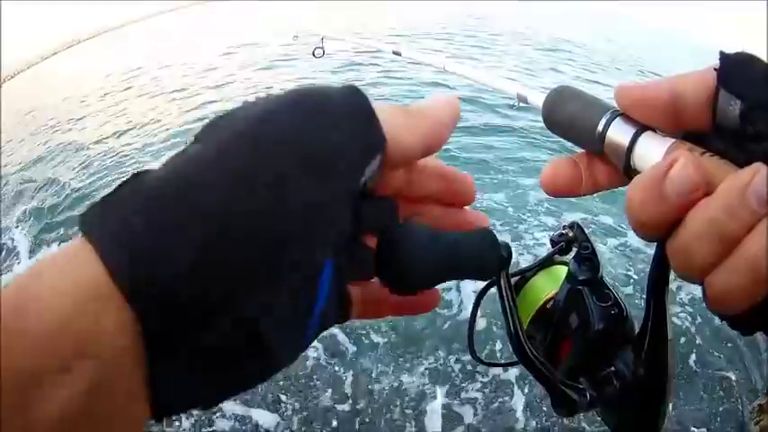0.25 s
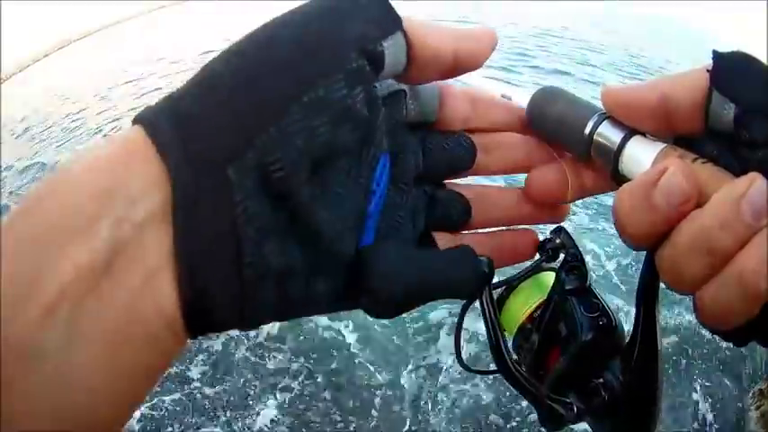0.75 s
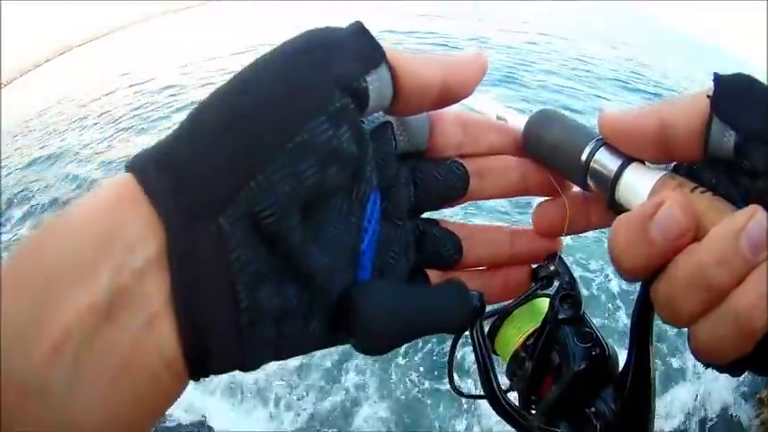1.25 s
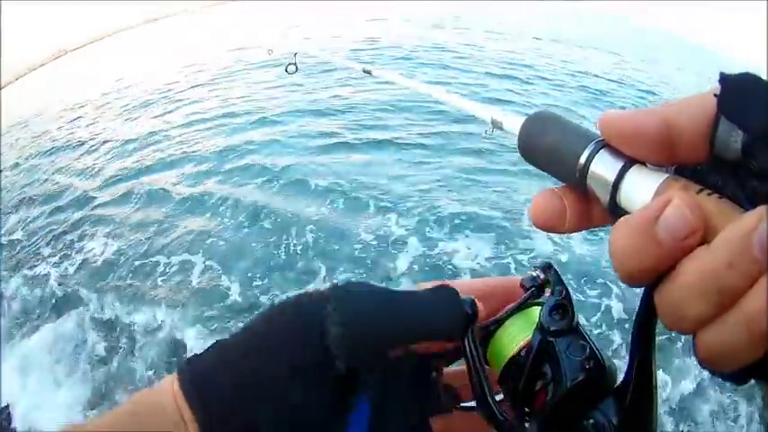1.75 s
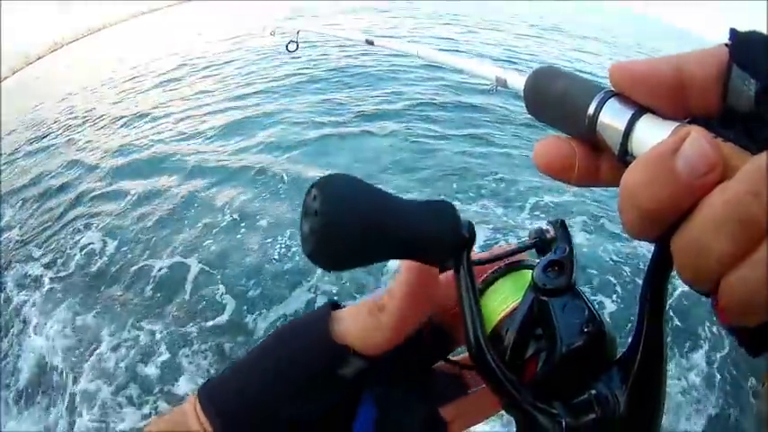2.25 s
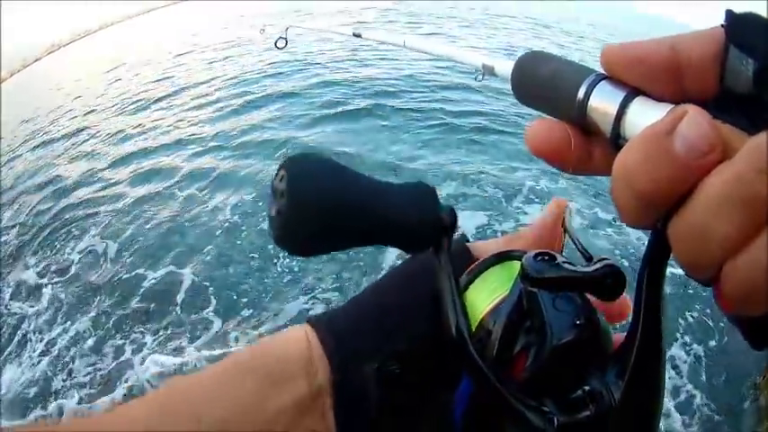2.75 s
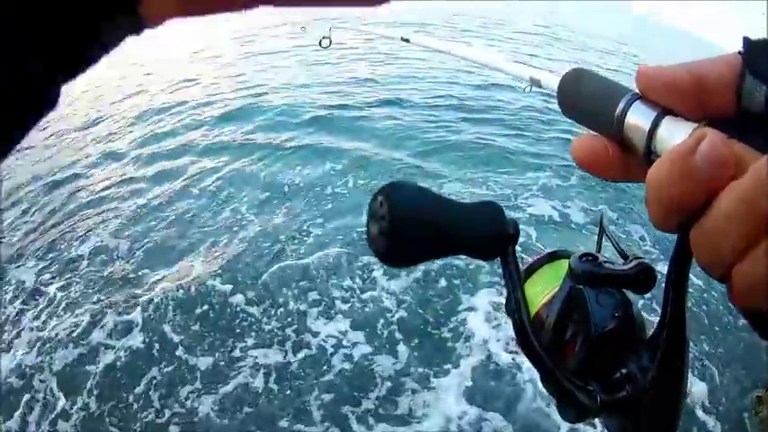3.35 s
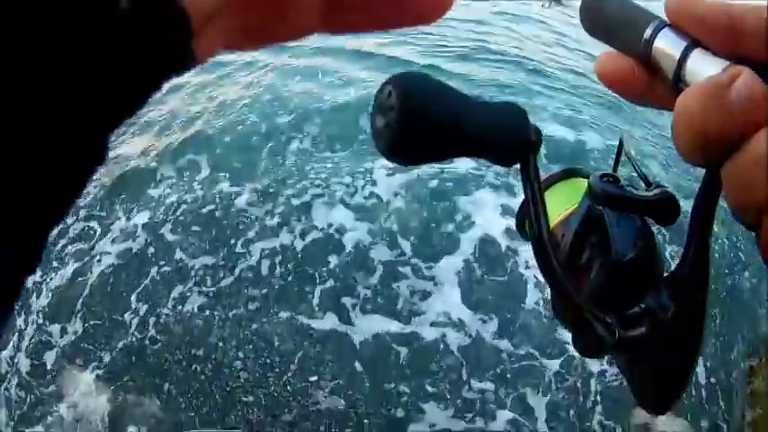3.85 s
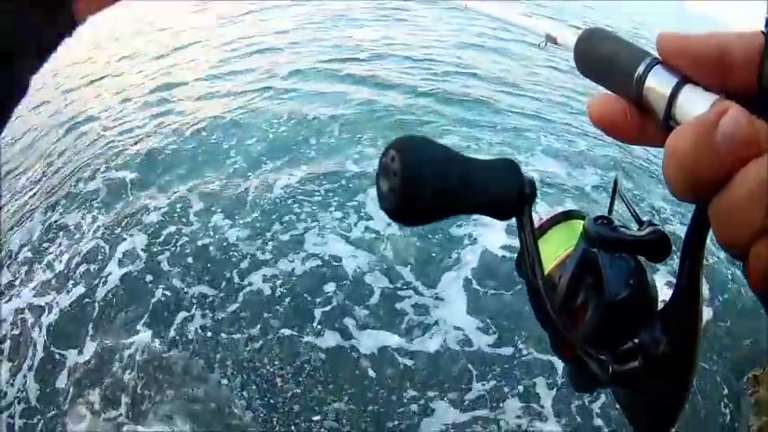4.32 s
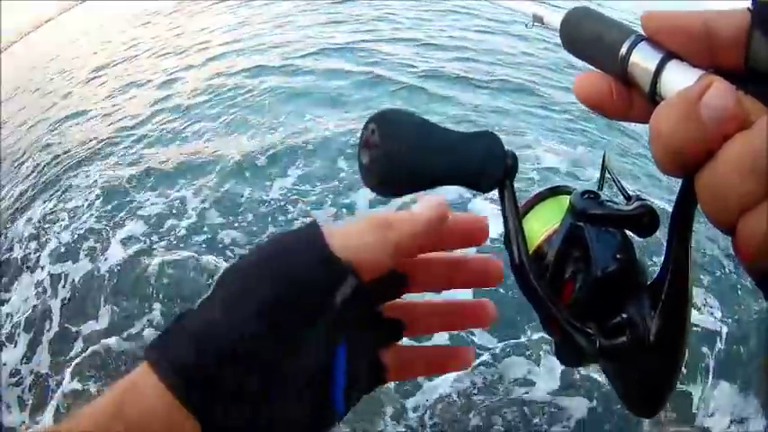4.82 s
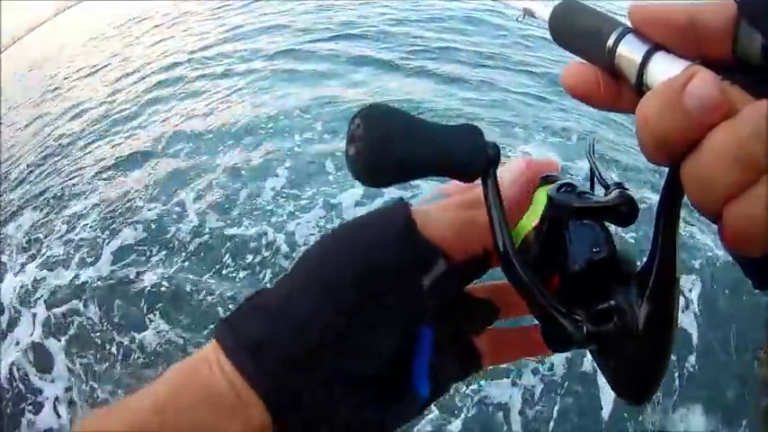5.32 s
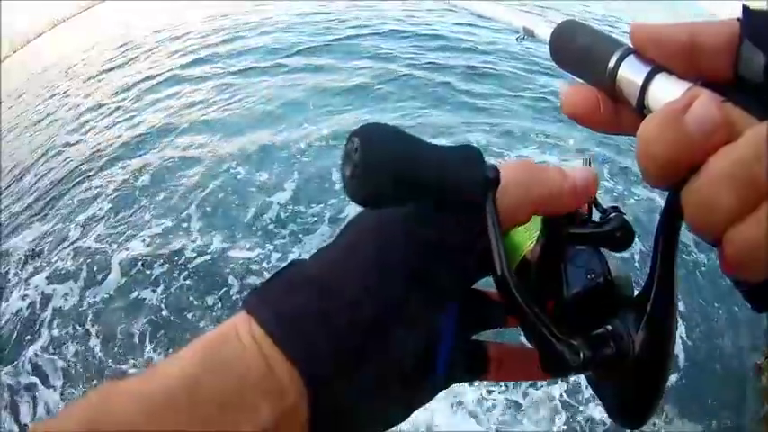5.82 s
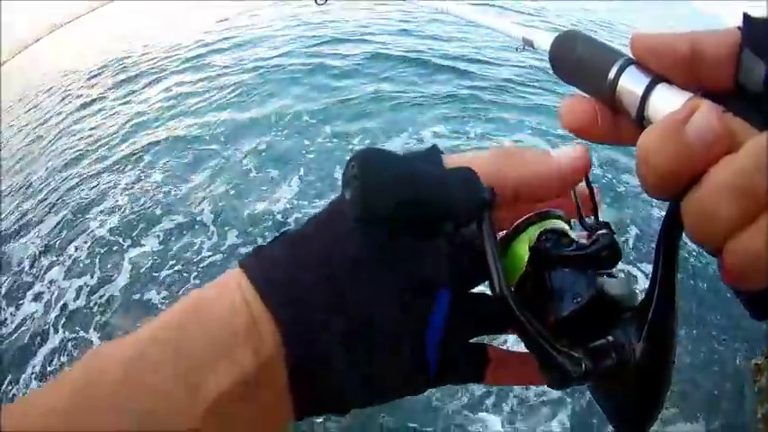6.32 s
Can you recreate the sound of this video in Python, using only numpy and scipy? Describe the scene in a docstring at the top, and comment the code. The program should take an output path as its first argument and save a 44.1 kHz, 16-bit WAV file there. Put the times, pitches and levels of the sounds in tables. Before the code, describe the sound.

Small waves slosh, wash and fizz against a rocky shore, sounding quiet, muffled and hollow through the closed plastic case of a body-worn camera. A fishing reel ticks faintly and trapped air gurgles. Midway, a gloved hand scuffs the case, making one loud, sharp click, a knock and a short rattle. The waves then swell again over a faint hum and hiss.

```python
"""On a rocky shore, small waves slosh, wash and fizz, heard by a body-worn camera in a plastic case.
The closed case muffles the water and gives it a hollow ring near 1.4 kHz. Trapped air gurgles and a
fishing reel ticks. Midway an angler's hand brushes and presses the case: a scuff, one sharp click,
a knock and a rattling release. The camera hums and hisses faintly throughout."""
import sys
import numpy as np
from scipy import signal
from scipy.fft import rfft, irfft, next_fast_len
from scipy.io import wavfile
from scipy.ndimage import map_coordinates

SR = 44100
rng = np.random.default_rng(int(sys.argv[2]) if len(sys.argv) > 2 else 0)


def to_wav(sig):
    """Store sig (one row per channel, or 1-D mono) as 16-bit WAV at the path in sys.argv[1].

    Samples outside -1..1 are clipped; the rate is SR.
    """
    pcm = np.clip(np.atleast_2d(sig), -1, 1) * 32767
    pcm = np.round(pcm).astype(np.int16)
    wavfile.write(sys.argv[1], SR, pcm.T)  # frames by channels


N = 290178
TOP_HZ = 15800  # the highest frequency the camera keeps

# tone of a fingertip sliding on plastic, also used for the reel: (frequency [Hz], relative level [dB])
RUB_TONE = [(80, -4.5), (500, 1), (1000, 1), (1700, 4), (2600, -11.5), (4400, -9.5), (5500, -23.5),
            (7200, -26.5), (8000, -42), (15000, -46.5)]


def amp(db):
    """Turn decibels into a volume factor."""
    return 10 ** (np.asarray(db) / 20)


def unit(x):
    """Scale a sound to an average (rms) size of 1."""
    return x / np.sqrt(np.mean(x ** 2) + 1e-20)


def along(points, hz):
    """Read between (frequency, level) points, with octaves evenly spaced."""
    frequencies, levels = np.transpose(points)
    return np.interp(np.log(hz + 1), np.log(frequencies + 1), levels)


def wobble(rate):
    """A smooth curve through `rate` random values a second."""
    return map_coordinates(rng.standard_normal(int(N * rate / SR) + 4), [np.arange(N) * rate / SR])


def swell(s, db, rise, fall, round_s):
    """A volume that climbs to a rounded peak at time s and dies away; rise and fall are in dB/s."""
    t = np.arange(N) / SR - s
    return amp(db - np.where(t < 0, rise, fall) * (np.hypot(t, round_s) - round_s))


def filtered(x, response):
    """Turn each frequency of a sound up or down by the factor response(hz)."""
    size = next_fast_len(len(x) + 8192)
    return irfft(rfft(x, size) * response(np.fft.rfftfreq(size, 1 / SR)), size)[:len(x)]


def band(x, lo_hz, hi_hz):
    """Keep one range of frequencies, with soft edges, at an average size of 1."""
    return unit(filtered(x, lambda hz: ((1 + (lo_hz / (hz + 1)) ** 12) * (1 + (hz / hi_hz) ** 12)) ** -.5))


def add(track, s, sound):
    """Mix a sound into the track, starting at s seconds."""
    part = track[round(s * SR):][:len(sound)]
    part += sound[:len(part)]


def through_case(x, tone):
    """Give a sound its tone, then boost the narrow ranges where the plastic case rings."""
    # ranges the case lets through best: (centre [Hz], width [Hz], boost [dB])
    peaks = [(1416, 110, 7.5), (1612, 97, 4), (3424, 120, 7), (4123, 130, 3), (4406, 180, 3),
             (5800, 190, 4), (7300, 340, 4)]
    boost = lambda hz: sum(db * np.exp(-((hz - centre) / width) ** 2) for centre, width, db in peaks)
    return filtered(x, lambda hz: amp(along(tone, hz) + boost(hz)))


def bubbles(per_s, spread_db, pops_db):
    """Countless bursting bubbles, heard through the case: a smooth rush with uneven pops on top."""
    # breaking water behind the case wall: (frequency [Hz], relative level [dB])
    water_tone = [(60, -3.5), (250, 0.5), (700, 0.5), (1200, 1.5), (1800, -1), (2200, -7.5), (2600, -19),
                  (3100, -19.5), (4500, -22), (5300, -33.5), (7200, -34.5), (8200, -50), (16000, -64.5)]
    pops = (rng.random(N) < per_s / SR) * rng.choice([-1, 1], N)
    pops = pops * amp(spread_db * rng.standard_normal(N))
    return through_case(rng.standard_normal(N) + amp(pops_db) * unit(pops), water_tone)


def surf():
    """Each wave sloshes between the rocks, washes over them, throws spray and leaves fizzing foam."""
    # waves reaching the rocks:
    # (crest time [s], wash level [dB], rise [dB/s], fall [dB/s], spray relative to wash [dB])
    waves = [(1.06, -59, 19, 30, -7), (1.55, -49.5, 19.5, 20, -13.5), (2.14, -52, 17, 22.5, -7.5),
             (2.90, -62.5, 93, 73, -13), (3.55, -63.5, 12, 13.5, -13), (5.00, -58.5, 19, 49, -14.5),
             (5.299, -50.5, 66, 40.5, -15.5), (5.889, -53.5, 65, 56.5, -2.5), (6.27, -65.5, 26, 14, -13)]
    lapping_db, full_wave_db = -70.5, -49.5  # the wash between waves and for a full wave
    foam_lag_s = .01
    t = np.arange(N) / SR
    powers = np.array([swell(s, db, rise, fall, round_s=.025) ** 2 for s, db, rise, fall, _ in waves])
    wash_db = 10 * np.log10(powers.sum(axis=0) + amp(lapping_db) ** 2)
    spray_db = 10 * np.log10(sum(power * amp(wave[-1]) ** 2 for power, wave in zip(powers, waves)))
    slosh_db = -54.5 + 0.81 * (wash_db - full_wave_db)  # swells less than the wash
    foam_db = -66.5 + np.interp(t - foam_lag_s, t, wash_db) - full_wave_db
    foam_db = 20 * np.log10(np.hypot(amp(foam_db), amp(spray_db - 12.5)))  # flying spray fizzes too
    churn_db = 0.24 * wobble(34) + 0.81 * wobble(70)  # tumbling water moves all four layers together
    slosh = band(bubbles(per_s=370, spread_db=1.5, pops_db=-6.5), 150, 950)
    wash = band(bubbles(per_s=900, spread_db=3.5, pops_db=-5.5), 950, 2600)
    foam = band(bubbles(per_s=900, spread_db=4.5, pops_db=-3.5), 3000, 12000)
    spray = band(bubbles(per_s=680, spread_db=4, pops_db=-3.0), 1700, 2100)
    return (slosh * amp(slosh_db + churn_db + 0.94 * wobble(25))
            + wash * amp(wash_db + churn_db + 0.46 * wobble(30))
            + spray * amp(spray_db + churn_db)
            + foam * amp(foam_db + churn_db + .5 * wobble(40)))


def open_sea():
    """Water farther out blends into an even, dull murmur."""
    # tone of the open sea: (frequency [Hz], relative level [dB])
    sea_tone = [(20, -2.5), (60, 3.5), (130, 1), (250, -4), (500, -9.5), (1100, -15.5), (1700, -19),
                (2200, -18), (2700, -25), (4500, -35.5), (5500, -42.5), (9000, -57)]
    return unit(through_case(rng.standard_normal(N), sea_tone)) * amp(-62.5 + 0.46 * wobble(9))


def electronics():
    """The camera's circuits add a faint, wavering hum and a steady hiss."""
    # tones of the electrical hum: (frequency [Hz], average level [dB])
    hum_tones = [(60, -70), (120, -71.5), (180, -74.5), (240, -77.5)]
    # the microphone's own noise: (frequency [Hz], relative level [dB])
    hiss_tone = [(100, -2), (3000, 0), (6000, -1.5), (11000, -4.5), (13500, -1.5), (15700, .5)]
    t = np.arange(N) / SR
    hum = sum(np.sqrt(2) * amp(db + 0.88 * wobble(6.1)) * np.sin(2 * np.pi * hz * t + .5 * wobble(4.4))
              for hz, db in hum_tones)
    hiss = unit(filtered(rng.standard_normal(N), lambda hz: amp(along(hiss_tone, hz))))
    return hum + amp(-76.5) * hiss


def reel_ticks():
    """Small parts of the fishing reel click, thin and short."""
    # light clicks of the reel: (time [s], level [dB], rough pitch [Hz])
    ticks = [(.665, -63.5, 6000), (2.7238, -60, 5400), (3.945, -65, 4800)]
    fade_s = 0.025  # time to fall 60 dB
    track, t = np.zeros(N), np.arange(SR // 20) / SR
    for s, db, hz in ticks:
        noise = band(through_case(rng.standard_normal(len(t)), RUB_TONE), 0.71 * hz, 1.6 * hz)
        add(track, s, noise * amp(db - 60 * t / fade_s))
    return track


def gurgles():
    """A trapped air pocket rises in pitch as it nears the surface."""
    # air gulping between the rocks:
    # (time [s], level [dB], starting pitch [Hz], pitch rise [Hz/s], time to fall 60 dB [s])
    air_pockets = [(2.594, -42, 115, 300, 0.081), (5.215, -45.5, 115, 1300, 0.17),
                   (5.233, -44, 386, 1500, 0.066)]
    track, t = np.zeros(N), np.arange(SR // 4) / SR
    for s, db, hz, rise, fade_s in air_pockets:
        volume = amp(db - 60 * t / fade_s) * (1 - np.exp(-t / 0.0058))
        add(track, s, volume * np.sin(2 * np.pi * (hz * t + rise * t * t / 2)))
    return track


def glove():
    """Cloth drags on the plastic with a dull, uneven rustle."""
    # glove strokes on the case: (peak time [s], level [dB], rise [dB/s], fall [dB/s])
    strokes = [(3.55, -60.5, 152, 59.5), (3.985, -57, 130.5, 90)]
    volume = sum(swell(s, db, rise, fall, round_s=.008) for s, db, rise, fall in strokes)
    return band(rng.standard_normal(N), 70, 510) * volume * amp(1.5 * wobble(56))


def finger_touches():
    """Each touch makes the case snap and ring with a thin crack; the finger then rubs on for a moment."""
    # fingers meeting the case; a harder touch is brighter, and the grip shifts the pitch:
    # (time [s], snap level [dB], hardness [Hz], pitch factor [ratio], rub level [dB])
    touches = [ (3.4869, -42.5, 6000, 1.23, -45.5), (3.4990, -41.5, 9000, 1.5, -50),
               (3.5052, -37, 3000, 1.38, -44), (3.6492, -1.5, 12000, 1.0, -40),
               (3.8591, -16, 3000, 0.98, -34), (3.866, -36, 3000, 1.0, -27),
               (4.0516, -40.5, 3000, 1.1, -43), (4.0725, -42, 5000, 1.4, -40),
               (4.0808, -28, 1200, 0.98, -53), (4.084, -20, 7000, 1.284, -32),
               (4.0878, -27.5, 2000, 0.97, -45), (4.1062, -30.5, 9000, 1.32, -38.5)]
    # tones of the struck case; wider ones die sooner:
    # (frequency before the grip shifts it [Hz], width [Hz], relative level [dB])
    case_tones = [(440, 264, -14), (520, 106, -6), (700, 124, -12), (1135, 85, -7), (1425, 135, -2),
                  (1595, 150, 0), (2250, 200, -17), (3066, 130, -17), (3475, 157, -11), (4400, 650, -23),
                  (5400, 250, -31), (6900, 500, -30)]
    rub_fade_s, crack_rise_s = .034, .0006  # time to fall 60 dB; time to peak
    track, t = np.zeros(N), np.arange(SR // 6) / SR
    wall = signal.butter(4, 7000, fs=SR, output="sos")  # the case wall swallows sound above 7 kHz
    crack_shape = (t / crack_rise_s * np.exp(1 - t / crack_rise_s)) ** 2
    for s, snap_db, hard_hz, pitch, rub_db in touches:
        # neighbouring tones start in opposite directions; a soft touch barely stirs the high ones
        ring = sum((-1) ** k * width * amp(db) / np.hypot(1, hz * pitch / hard_hz)
                   * np.exp(-np.pi * width * t) * np.sin(2 * np.pi * hz * pitch * t)
                   for k, (hz, width, db) in enumerate(case_tones))
        ring = signal.sosfilt(wall, ring * (1 - np.exp(-t / 0.00058)))
        snap = amp(snap_db) * ring / np.abs(ring).max()
        rub = unit(through_case(rng.standard_normal(len(t)), RUB_TONE))
        rub *= amp(rub_db - 60 * t / rub_fade_s) * (1 - np.exp(-t / 0.0027))
        crack = rng.standard_normal(len(t)) * crack_shape
        crack *= amp(-47 + .45 * snap_db) / np.hypot(1, TOP_HZ / hard_hz)  # loud, hard snaps crack more
        add(track, s, snap + rub + crack)
    return track


def mount_thuds():
    """The camera rocks briefly on its mount when pushed; a quicker push stirs higher tones."""
    # tones of the rocking camera: (frequency [Hz], relative level [dB], time to fall 60 dB [s])
    mount_tones = [(48.1, 0, .16), (114, -1, 0.051), (179, -2.5, 0.052), (536, 0.5, 0.03)]
    # soft pushes on the camera: (time [s], level [dB], frequency stirred most [Hz])
    pushes = [(3.496, -38.5, 45), (3.859, -26, 298), (3.8687, -25.5, 114), (3.976, -34, 280),
              (4.082, -26.5, 350), (4.1075, -33, 650)]
    track, t = np.zeros(N), np.arange(SR // 4) / SR
    for s, push_db, push_hz in pushes:
        rocking = sum(amp(db - 60 * t / fade_s) * np.sin(2 * np.pi * hz * t)
                      / (1 + (hz / push_hz - push_hz / hz) ** 2)
                      for hz, db, fade_s in mount_tones)
        add(track, s, amp(push_db) * rocking * (1 - np.exp(-t / 0.00072)))
    return track


def scene():
    """Water, handling and the camera's own noise meet at one microphone."""
    water = surf() + gurgles() + open_sea()
    handling = finger_touches() + glove() + mount_thuds() + reel_ticks()
    return (water + handling + electronics())[None]


def record(dry):
    """The camera cuts off the very highest treble."""
    return np.array([filtered(channel, lambda hz: hz < TOP_HZ) for channel in dry])


dry = scene()
out = record(dry)
to_wav(out)
```